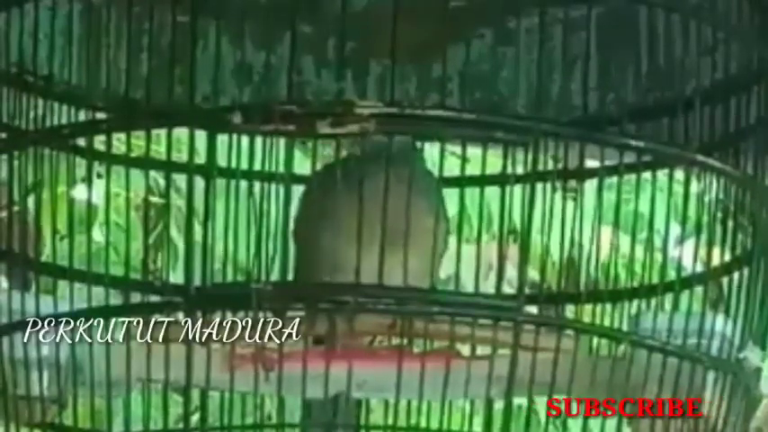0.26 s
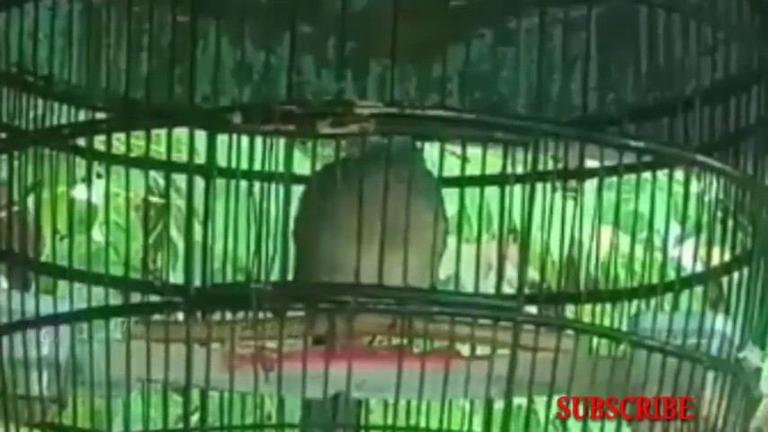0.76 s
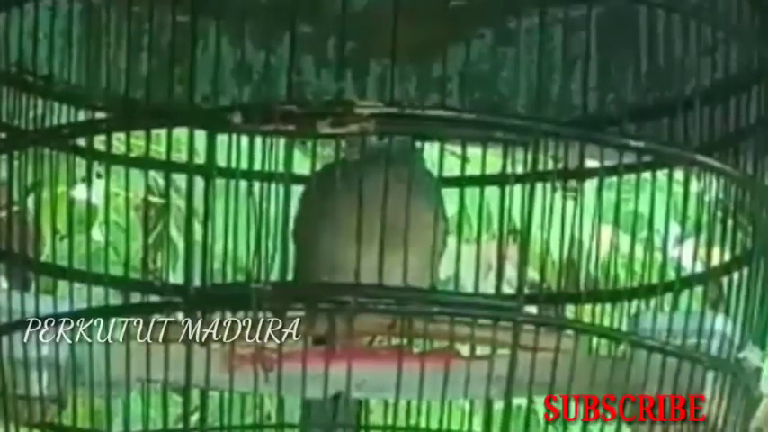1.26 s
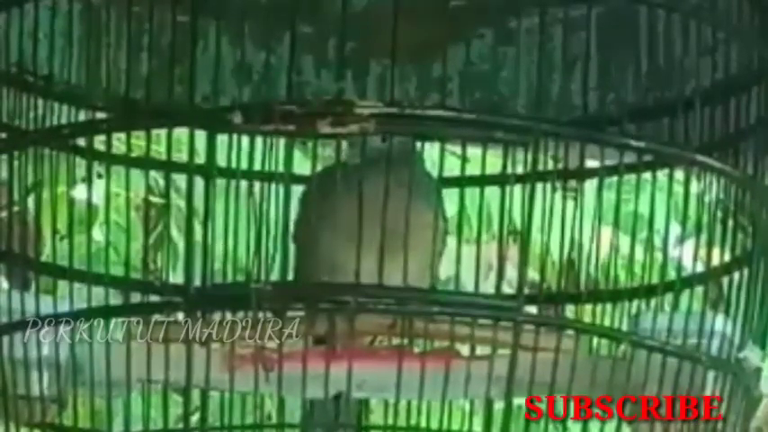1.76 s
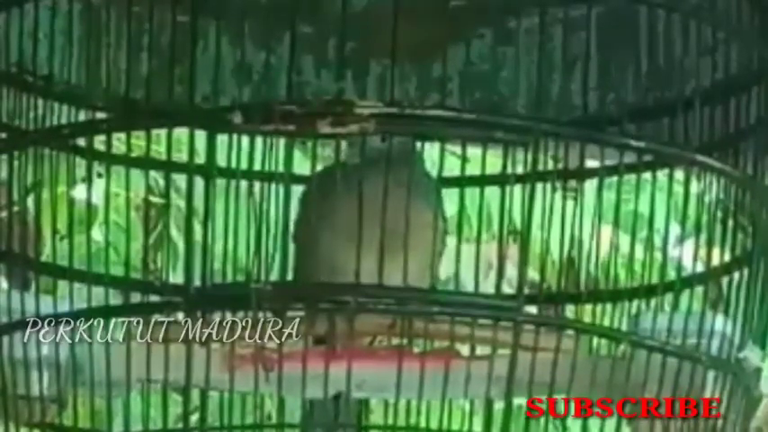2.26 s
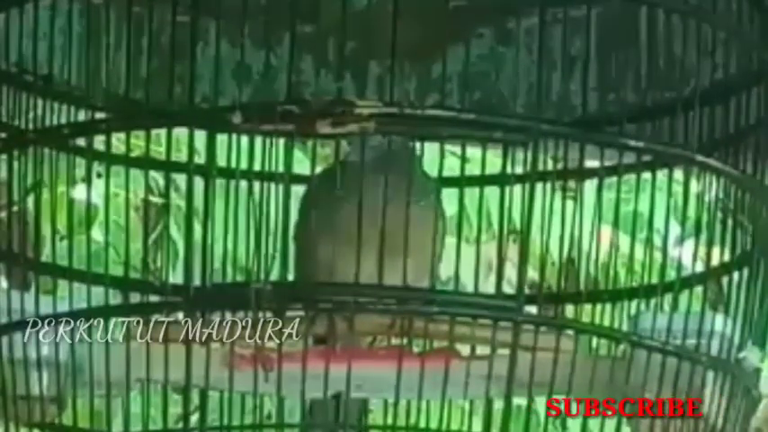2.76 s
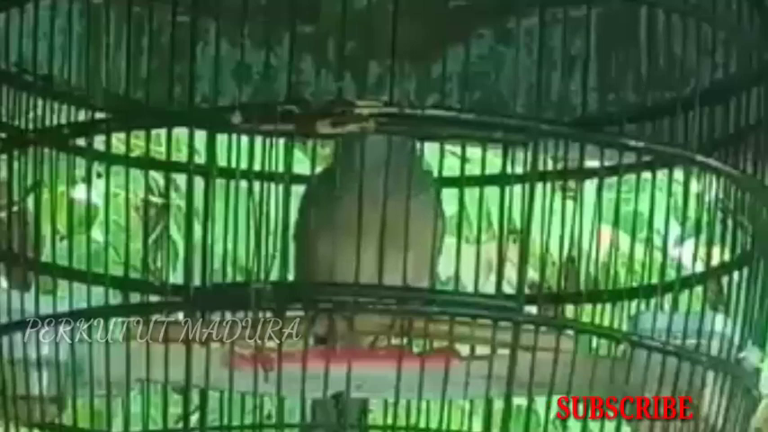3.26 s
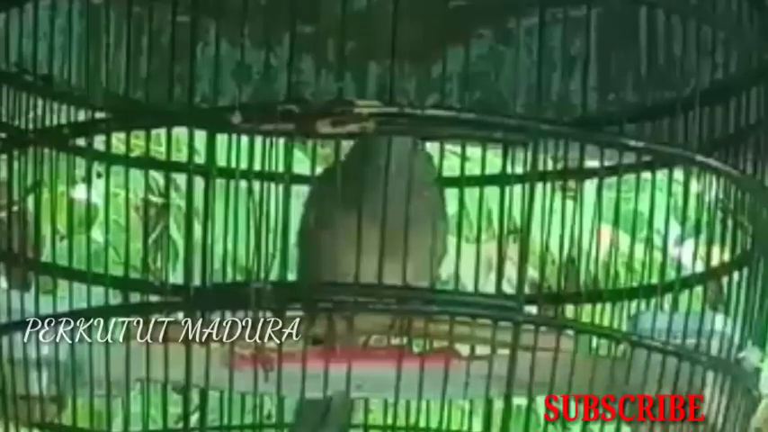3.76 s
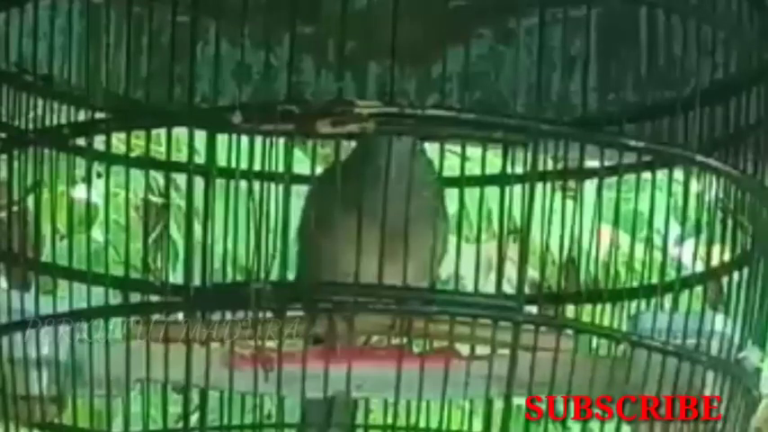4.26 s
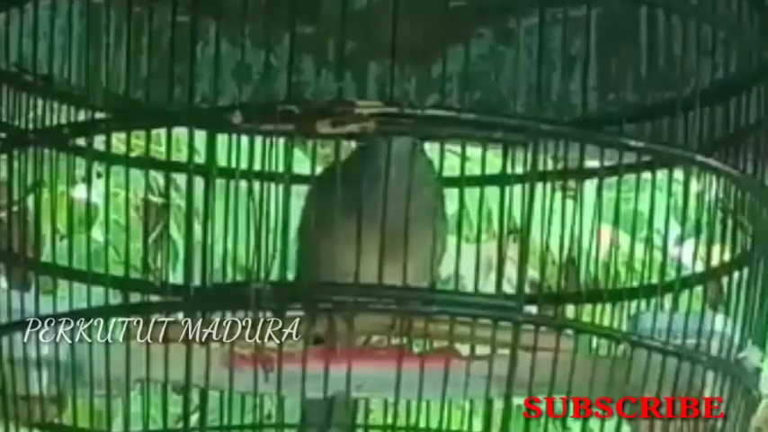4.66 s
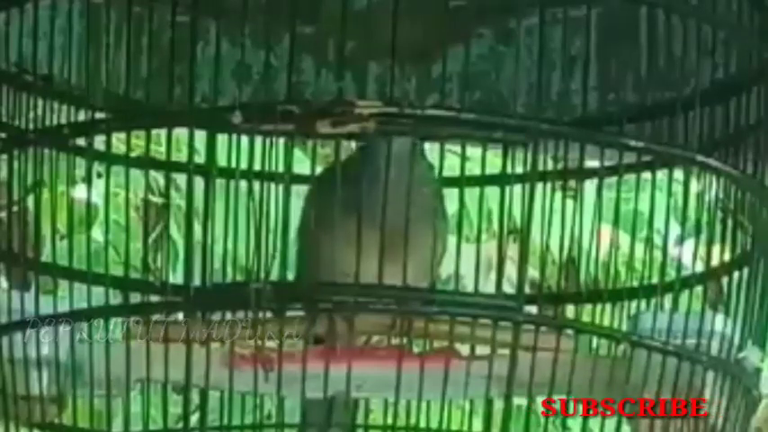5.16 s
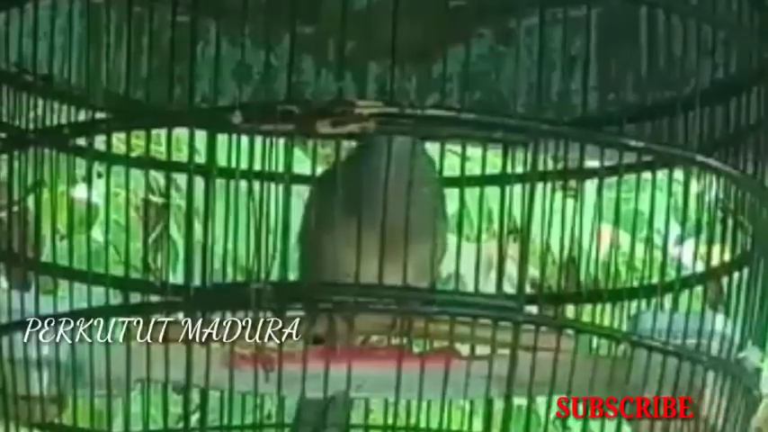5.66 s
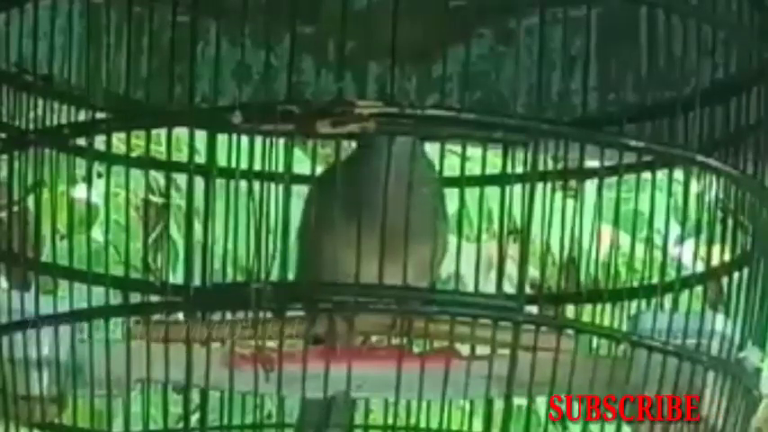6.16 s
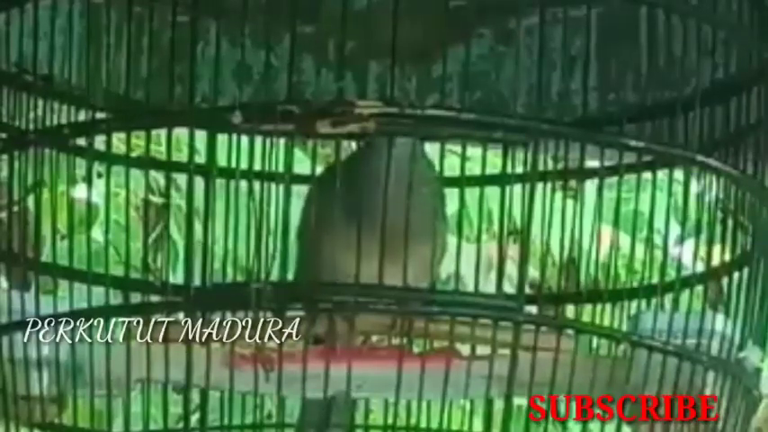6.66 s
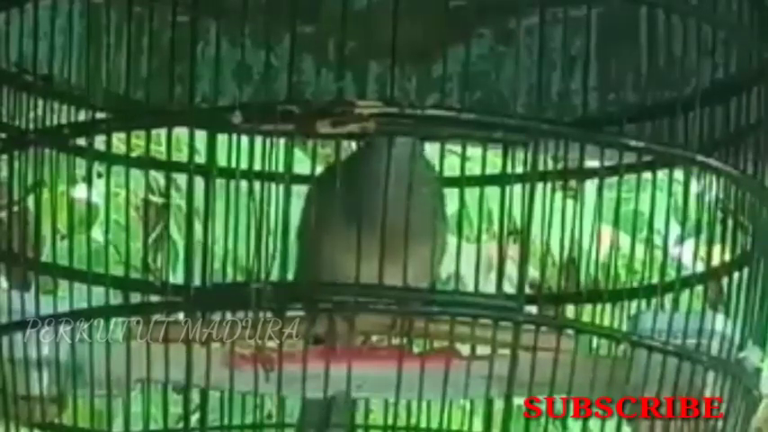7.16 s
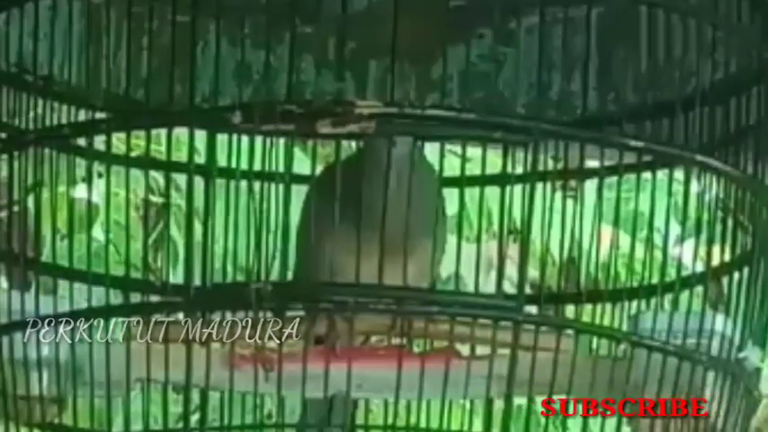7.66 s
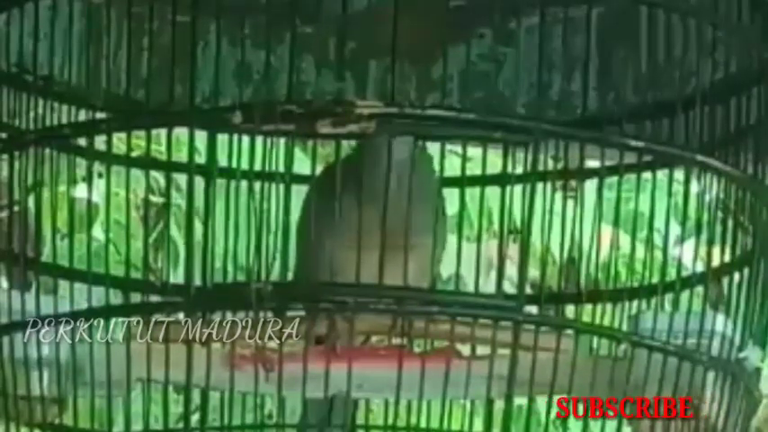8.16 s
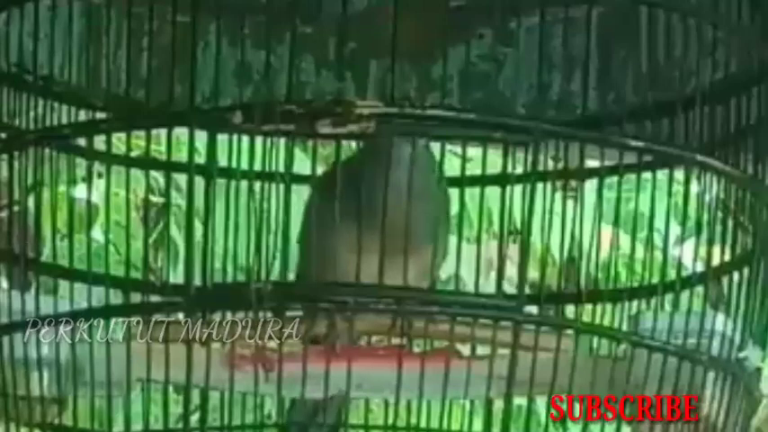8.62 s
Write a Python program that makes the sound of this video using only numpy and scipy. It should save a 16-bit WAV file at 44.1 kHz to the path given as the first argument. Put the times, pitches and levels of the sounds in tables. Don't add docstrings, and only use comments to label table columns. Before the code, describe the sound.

Close dove cooing in rounded flute-like bursts with pauses, distant replies, small taps and rustles, soft traffic rumble and an engine slowly gaining speed.

```python
import sys
import numpy as np
from scipy import signal
from scipy.fft import rfft, irfft, dct, next_fast_len
from scipy.io import wavfile
from scipy.ndimage import uniform_filter1d, minimum_filter1d

SR = 44100
rng = np.random.default_rng(int(sys.argv[2]) if len(sys.argv) > 2 else 0)


def generate_wav(signal):
    frames = np.transpose(np.atleast_2d(signal))
    scaled = np.clip(frames, -1, 1) * 32767
    pcm = np.round(scaled).astype(np.int16)
    wavfile.write(sys.argv[1], SR, pcm)


def gain_from_db(level_db):
    decades = np.asarray(level_db, float) / 20
    return 10 ** decades


N = 392049
T = np.arange(N) / SR


def unit_rms(x):
    return x / np.sqrt(np.mean(x ** 2) + 1e-20)


def in_time(rows):
    s, *columns = np.transpose(rows)
    return [np.interp(T, s, c) for c in columns]


def at_hz(points, hz):
    f, v = np.transpose(points)
    return np.interp(np.log(hz + 1), np.log(f), v)


def drift(rate_hz):
    pole = np.exp(-80 * np.pi * rate_hz / SR)
    noise = rng.standard_normal(N // 40 + 2002)
    slow = unit_rms(signal.lfilter([1], [1, -2 * pole, pole * pole], noise)[2000:])
    return np.interp(np.arange(N) / 40, np.arange(len(slow)), slow)


def phase(hz):
    return 2 * np.pi * np.cumsum(hz) / SR


def bump(at_s, half_s):
    return np.exp(-((T - at_s) / half_s) ** 2)


def band(x, low_hz, high_hz):
    sos = signal.butter(2, [low_hz, min(high_hz, .45 * SR)], "band", fs=SR, output="sos")
    return signal.sosfilt(sos, x)


def lowpass(x, cut_hz):
    return signal.sosfilt(signal.butter(4, cut_hz, fs=SR, output="sos"), x)


def left_right(left_db, right_db):
    return gain_from_db([[left_db], [right_db]])


LEFT_LAG_S = 0.000996


def sides(x, lean_db):
    late = np.interp(T - LEFT_LAG_S, T, x)
    return np.array([late * gain_from_db(lean_db / 2), x * gain_from_db(-lean_db / 2)])


# freq_hz, left_over_right_db
BALANCE = [(60, 5.5), (110, 2), (200, 4), (380, 1.5), (700, 7.5), (1290, 4.5), (2380, 16), (4400, 16),
           (8120, 9), (15000, -47.5)]
# freq_hz, share common to both sides
COHERENCE = [(60, 0.99), (160, 0.88), (300, 1), (600, 0.58), (1200, 0.062), (4000, 0.017)]


def street_noise(spectrum, patchy_db):
    size = next_fast_len(N, True)
    hz = np.arange(size // 2 + 1) * SR / size
    shared, left, right = rfft(rng.standard_normal((3, size)))
    alike = np.clip(at_hz(COHERENCE, hz), 0, 1)
    lean = gain_from_db(at_hz(BALANCE, hz) / 2)
    low_hz, high_hz = spectrum[0][0], spectrum[-1][0]
    colour = gain_from_db(at_hz(spectrum, hz)) * (hz > low_hz) * (hz < high_hz)
    late = np.exp(-2j * np.pi * hz * LEFT_LAG_S)
    common = np.sqrt(alike) * shared * [late, late ** 0]
    separate = np.sqrt(1 - alike) * np.array([left, right])
    pair = colour * (common + separate) * [lean, 1 / lean]
    out, together = 0, drift(8)
    place = 1.5 * np.log2(hz + 1)
    for k in range(int(1.5 * np.log2(low_hz)), int(1.5 * np.log2(high_hz)) + 2):
        patch = irfft(pair * np.sqrt(np.clip(1 - np.abs(place - k), 0, 1)), size)[:, :N]
        out = out + patch * gain_from_db(patchy_db * (0.32 * together + drift(18)))
    return out / np.std(out.mean(axis=0))


# freq_hz, density_db
RUMBLE = [(13, -49.5), (22, -50), (43, -19), (102, -3), (129, -3.5), (159, -4), (425, -24), (481, -29.5),
          (600, -24), (780, -28.5), (1320, -120)]
# freq_hz, density_db
HISS = [(260, -24.5), (450, -9), (798, 0), (932, 0), (966, 3), (1520, 5), (2310, 0), (3420, -4.5),
        (3950, -6), (6290, -5.5), (7350, -18.5), (7800, -99.5), (10100, -53.5), (17200, -120)]
# freq_hz, density_db
AIR = [(4790, -45), (8150, 0), (8820, 9.5), (9310, 5), (11300, -5), (12900, -27), (14500, -32),
       (15300, -36), (15600, -23)]
# centre_s, lift_db, half_length_s
RUSTLES = [(0.28, 4, 0.099), (1.718, 5.5, 0.055), (1.955, -0.5, .05), (2.083, 4.5, 0.096),
           (2.516, 5.5, 0.027), (2.91, 5, 0.047), (3.809, 6.5, 0.038), (4.06, 1.5, .03), (4.907, 7, 0.034),
           (6.134, 7, 0.059), (7.0, 2, 0.069), (8.532, -5.5, 0.032), (8.624, 5, 0.052)]


def street(calling):
    rumble_db = -45.5 + .5 * T - 2 * calling
    hiss_db = -42 + 0.94 * drift(7.4) - 0.5 * calling
    air_db = -58.5 - np.array([[2.0], [4.0]]) * calling
    rustle = gain_from_db(sum(db * bump(s, half_s) for s, db, half_s in RUSTLES)) - 1
    hiss = street_noise(HISS, patchy_db=1.6)
    hiss = hiss + rustle * (.45 * hiss + 0.7 * band(hiss, 1200, 3300))
    rumble = gain_from_db(rumble_db) * street_noise(RUMBLE, patchy_db=3.5)
    return rumble + gain_from_db(hiss_db) * hiss + gain_from_db(air_db) * street_noise(AIR, patchy_db=2.0)


# time_s, level_db
HUM = [
    (0, -47.5),
    (.5, -42.5),
    (.75, -63),
    (1.75, -49.5),
    (1.95, -51),
    (3.1, -44.5),
    (3.7, -57.5),
    (4.15, -46.5),
    (4.6, -51),
    (5.0, -49.5),
]
# time_s, firing_hz, load_db
ENGINE = [
    (5.7, 24.86, -50.5),
    (6.2, 23.94, -35.5),
    (6.6, 25.26, -42.5),
    (6.85, 25.55, -53),
    (7.15, 26.78, -43),
    (8.1, 27.68, -31.5),
    (8.67, 28.21, -40),
    (8.73, 29.67, -43),
    (8.89, 28.45, -36.5),
]


def engine_and_hum():
    pipe_hz, pipe_width_hz = 124, 8.6
    rate_hz, load_db = in_time(ENGINE)
    turn = phase(rate_hz)
    running = np.clip((T - ENGINE[0][0]) / 0.6, 0, 1)
    low = 0
    for order in range(4, 6):
        order_db = load_db - ((order * rate_hz - pipe_hz) / pipe_width_hz) ** 2
        low = low + running * gain_from_db(order_db) * np.sin(order * turn)
    hum_db, = in_time(HUM)
    low = low + (1 - running) * gain_from_db(hum_db) * np.sin(phase(121.7 + 1.5 * drift(2.5)))
    return sides(np.sqrt(2) * low * gain_from_db(1.5 * drift(3)), 3.3)


# time_s, pitch_hz, level_db
WHINE = [
    (8.5, 2800, -52),
    (8.54, 2880, -42),
    (8.62, 2970, -44),
    (8.66, 3190, -40),
    (8.76, 3470, -41),
    (8.82, 3680, -42),
    (8.89, 3800, -41),
]


def gear_whine():
    hz, db = in_time(WHINE)
    rough = 0.94 + .5 * drift(120)
    whine = gain_from_db(db + 1.0) * (T > WHINE[0][0]) * rough * np.sin(phase(hz + 32 * drift(50)))
    haze = band(rng.standard_normal(N), 100, 560)
    whine += gain_from_db(db + 8.5) * (T > 8.66) * haze * np.sin(phase(hz))
    whine += gain_from_db(-44) * bump(7.1, 0.044) * drift(180) * np.sin(2 * np.pi * 4220 * T)
    return sides(whine, 12)


# start_s, peak_db, pitch_hz
KNOCKS = [(0.279, -27, 2220), (0.3455, -32, 2390), (1.318, -26, 1710), (1.5716, -24.5, 1420),
          (1.6882, -27, 1610), (2.2286, -26, 1760), (2.2754, -36, 2750), (2.3243, -25.5, 1600),
          (2.732, -30, 1640), (3.171, -42.5, 2210), (3.268, -29, 1720), (3.4224, -29.5, 1400),
          (4.0394, -36.5, 3200), (4.5686, -23.5, 2150), (4.5702, -34.5, 4020), (4.8286, -38.5, 1850),
          (5.1347, -32, 1520), (5.215, -34.5, 2350), (5.6047, -28.5, 1680), (6.0051, -23.5, 1750),
          (6.5174, -29.5, 2110), (6.621, -52, 1450), (6.895, -33, 2400), (6.976, -29, 1480),
          (7.331, -26.5, 1960), (7.352, -30, 2580), (7.654, -24, 1910), (7.48, -32, 2420),
          (7.77, -30, 1285), (7.889, -27.5, 2170), (8.192, -30, 2280), (8.598, -34, 3900),
          (8.669, -35.5, 4900), (1.645, -36, 4480), (1.714, -37.5, 3900), (1.91, -34.5, 2700)]


def knocks():
    rattle_t60_s, crack_t60_s, crack_db, snap = 0.033, 0.0053, -15.5, 14
    out, noise, t = np.zeros(N), rng.standard_normal(N), T[:SR // 8]
    for start_s, peak_db, hz in KNOCKS:
        at = round(start_s * SR)
        part = t[:N - at]
        burst = noise[at:at + len(part)] * gain_from_db(-60 * part / rattle_t60_s)
        burst[0] += snap
        body = band(burst, .75 * hz, 1.5 * hz)
        crack = band(burst * gain_from_db(crack_db - 60 * part / crack_t60_s), 2500, 6500)
        out[at:at + len(part)] += gain_from_db(peak_db + 3) * (body + crack)
    return sides(lowpass(out, 7000), 15.0)


# start_s, peak_db, lower_band_db, t60_s
SWISHES = [(0.343, -41.5, 13.5, 0.022), (0.918, -47.5, 15, 0.07), (1.588, -28, -5, 0.17),
           (1.7754, -32.5, 4, 0.31), (1.963, -40, 1, 0.14), (1.992, -24, -8.5, 0.16), (2.479, -45, 8, .05),
           (6.69, -39, 1, 0.063), (6.95, -46, -2, .05), (8.086, -39, -1, .05), (5.333, -36.5, -3, 0.11),
           (2.868, -53, 18, 0.16), (3.171, -61, 24.5, 0.013), (3.773, -42.5, 8.5, 0.051),
           (4.038, -27.5, 5, 0.29), (4.568, -44, 3, 0.026), (5.136, -36, 7.5, 0.046),
           (5.23, -29.5, -13, 0.048), (5.353, -29.5, -3.5, 0.12), (5.764, -51, 7, 0.015),
           (6.098, -31, 4.5, 0.49), (6.7078, -30, -3.5, 0.056), (7.327, -35, 1, 0.062),
           (7.6612, -40.5, 6, 0.11), (7.9458, -29.5, -6, 0.13), (8.312, -32.5, 0, 0.47),
           (8.4403, -35.5, 0.5, 0.08), (8.594, -41, -2, .03)]


def swishes():
    noise, t = rng.standard_normal((2, N)), T[:SR // 4]
    bright = 0.71 * band(noise, 8600, 14000) + 1.2 * band(noise, 13300, 16500)
    dull = band(noise, 4800, 7200)
    high, low = np.zeros(N), np.zeros(N)
    for start_s, peak_db, lower_db, t60_s in SWISHES:
        at = round(start_s * SR)
        part = t[:N - at]
        stroke = gain_from_db(peak_db - 60 * part / max(t60_s, .01)) * np.clip(part / 0.0029, 0, 1)
        high[at:at + len(part)] += stroke
        low[at:at + len(part)] += stroke * gain_from_db(lower_db)
    return 0.74 * bright * high + dull * low * left_right(4.0, -6.0)


def coo(notes):
    out = np.zeros(N)
    wobble, flutter = drift(40), drift(65)
    for start_s, scoop_s, length_s, top_hz, end_hz, level_db in notes:
        at = round(start_s * SR)
        t = T[:min(round(length_s * SR), N - at)]
        span = slice(at, at + len(t))
        depth = .3 * min(scoop_s / .018, 1)
        climb = depth * (1 - np.sin(np.clip(t / scoop_s, 0, 1) * np.pi / 2))
        arch = .07 * min(length_s / .2, 1) ** 2 * np.exp(-t / .025)
        hz = (top_hz + (end_hz - top_hz) * (t / length_s) ** 1.486) * (1 - climb - arch)
        turn = phase(hz * (1 + .008 * min(0.065 / length_s, 1) * wobble[span]))
        slow_rise_s = .6 * length_s * (end_hz > top_hz + 50)
        rise_s = max(scoop_s, .012, .14 * length_s, slow_rise_s)
        swell = np.clip(t / rise_s, 0, 1) ** .9 * np.clip((length_s - t) / .012, 0, 1)
        shake_db = 1.8 * min(.07 / length_s, 1) * flutter[span]
        resonance = gain_from_db(-30) / (1 + ((2 * hz - 2070) / 110) ** 2) * min(length_s / .15, 1)
        octave = gain_from_db(-30) * (hz < 1120) + resonance
        tone = np.sin(turn) + octave * np.sin(2 * turn)
        out[span] += gain_from_db(level_db + 9.5 + shake_db) * swell * tone
    return signal.sosfilt(signal.butter(4, 700, "high", fs=SR, output="sos"), out)


# after_start_s, length_s, top_hz, end_hz, level_db
FAR_NOTES = [
    (-.005, 0.064, 1005, 998, -36.5),
    (0.035, .13, 1270, 1223, -44.5),
    (.17, 0.1, 1214, 1127, -43),
    (.29, .05, 998, 1002, -40),
    (.32, 0.13, 1211, 1174, -45),
]
# start_s, length_s, top_hz, end_hz, level_db
FAR_ENDINGS = [
    (.79, .08, 1185, 1180, -41),
    (.66, .09, 1000, 990, -46),
    (.72, .07, 1120, 1100, -46),
    (4.25, .12, 1200, 1180, -45),
    (4.625, .065, 1215, 1170, -47),
    (4.7, .055, 1170, 1110, -46),
    (4.77, .06, 1185, 1170, -51),
    (7.56, .075, 1215, 1170, -45),
    (7.675, .065, 1170, 1110, -45),
]
# start_s, level_db
FAR_PHRASES = [
    (0.43, -2.5),
    (4.19, -3),
    (7.106, -3.5),
]


def far_dove():
    scoop_s = 0.021
    notes = [(s, scoop_s, *shape) for s, *shape in FAR_ENDINGS]
    for start_s, phrase_db in FAR_PHRASES:
        notes += [(start_s + s, scoop_s, *shape, db + phrase_db) for s, *shape, db in FAR_NOTES]
    return coo(notes) * gain_from_db(-drift(25)) * (.7 + .7 * drift(90))


# start_s, length_s, top_hz, end_hz, level_db
LEVEL_NOTES = [(1.028, 0.095, 1179, 1082, -24), (1.49, 0.036, 1192, 1210, -33.5),
               (1.735, 0.034, 1195, 1180, -41.5), (3.434, 0.195, 1031, 1019, -15),
               (3.629, .03, 1018, 1008, -22), (3.719, 0.039, 995, 990, -27), (3.888, .075, 1188, 1059, -19),
               (3.91, .06, 979, 970, -21.5), (4.053, 0.027, 1102, 1160, -40.5),
               (0.85, 0.036, 894, 914, -31), (8.67, 0.036, 959, 1008, -26), (3.669, 0.038, 971, 1005, -21),
               (3.749, 0.081, 986.6, 997, -22), (3.839, 0.043, 976, 1005, -22.5),
               (3.955, 0.073, 1006, 1006, -27.5), (5.553, 0.066, 1226, 1208, -14),
               (5.605, 0.062, 1209, 1129, -17), (5.657, 0.097, 1008, 966, -23),
               (8.395, 0.047, 1120, 1056, -19), (8.449, 0.044, 1023, 960, -18.5),
               (8.497, 0.078, 993, 953, -20.5), (8.597, 0.04, 1025, 987, -19), (8.639, .022, 992, 955, -21),
               (8.564, 0.039, 959, 955, -27.5), (8.773, 0.11, 1025, 968, -28.5)]
# start_s, length_s, top_hz, level_db, undertone_db
LEAPS = [
    (0.96, 0.039, 1243, -15.5, -36),
    (5.489, 0.081, 1195, -20, -26.5),
    (5.69, 0.031, 1205, -17, -26.5),
    (8.288, 0.1, 1174, -17.5, -21.5),
    (8.701, 0.069, 1123, -20, -26),
]
# start_s, length_s, top_hz, level_db
SWOOPS = [
    (0.874, 0.11, 1262, -17),
    (1.283, 0.051, 1195, -22.5),
    (1.396, 0.051, 1196, -19.5),
    (1.561, 0.065, 1195, -20.5),
    (6.073, 0.065, 1195, -22),
]
# start_s, end_s, top_hz, level_db
TRILLS = [
    (1.118, 1.265, 1090, -21),
    (5.717, 6.05, 1123, -19),
]
# start_s, level_db
LEAD_INS = [
    (.87, -27.5),
    (1.381, -27),
    (1.545, -26.5),
    (6.061, -29.5),
    (5.462, -19),
    (8.255, -18.5),
]


def song():
    level_scoop_s, pulse_s = .0045, 0.03

    def sagging(rows, scoop_s, sag_hz_per_s):
        return [(s, scoop_s, length_s, hz, hz - sag_hz_per_s * length_s, db) for s, length_s, hz, db in rows]

    def undertone(s, db):
        return (s + .022, level_scoop_s, .055, 968.7, 935.8, db)

    pulses = []
    uneven = rng.standard_normal((len(TRILLS), 12, 2))
    for (start_s, end_s, hz, db), chance in zip(TRILLS, uneven):
        for s, (late, high) in zip(np.arange(start_s, end_s, .038), chance):
            pulses.append((s + .002 * late, pulse_s, hz + 13 * high, db))
    afterbeats = [(s + length_s, 0.075, 1195, db - 14) for s, length_s, _, db in SWOOPS]
    notes = [(s, level_scoop_s, *shape) for s, *shape in LEVEL_NOTES]
    notes += [(s, level_scoop_s, .05, 925, 1005, db) for s, db in LEAD_INS]
    notes += sagging([row[:-1] for row in LEAPS], 0.015, 1100)
    notes += sagging(SWOOPS, 0.018, 290)
    notes += sagging(pulses + afterbeats, .019, 1700)
    notes += [undertone(s, db - 8) for s, _, _, db in pulses[::2]]
    notes += [undertone(s, db) for s, *_, db in LEAPS]
    notes += [undertone(s, db - 12) for s, _, _, db in SWOOPS]
    return notes


# start_s, end_s
ROLLED = [
    (1.0, 1.8),
    (5.45, 6.3),
]


def near_dove():
    beat = np.sin(phase(53 + 6 * drift(15)))
    rolled = sum((T > start_s) & (T < end_s) for start_s, end_s in ROLLED)
    return coo(song()) * (1 + .5 * beat * rolled)


# centre_s, level_db
PUFFS = [
    (0.866, -38),
    (3.425, -31),
    (5.468, -33.5),
    (8.264, -36),
]


def puffs():
    swell = sum(gain_from_db(db) * bump(s, 0.021) for s, db in PUFFS)
    breath = band(band(rng.standard_normal((2, N)), 762, 1750), 762, 1750)
    return swell * unit_rms(breath) * left_right(3.0, -3.0)


# freq_hz, left_db, right_db, t60_s
PORCH_MODES = [(898, -5.5, -15, .3), (835, -11.5, -5, .3), (862, 0, -12, 0.11), (996, -24.5, -12, 0.15),
               (970, -4.5, -4.5, 0.11), (1057.6, 3, -0.5, .3), (1133, 4, -14.5, 0.24),
               (1081.5, -10.5, 2, 0.39), (1109, -2.5, -15.5, 0.6), (1137, -12.5, -7, 1),
               (1330, -31.5, -28, 0.3), (1160, -7.5, -34.5, 0.59), (1262, -13.5, -10.5, 0.12),
               (1138.4, -6, -16, .3)]


def porch(x):
    t = T[:SR // 2]
    tail = rng.standard_normal((2, len(t))) * gain_from_db(-60 * t / 0.4) * np.clip(t / 0.0075, 0, 1)
    reply = tail / np.sqrt(np.sum(tail ** 2, axis=1, keepdims=True)) * left_right(-1.5, -7)
    starts = rng.uniform(0, 2 * np.pi, (len(PORCH_MODES), 2, 1))
    for (hz, left_db, right_db, t60_s), start in zip(PORCH_MODES, starts):
        ring = gain_from_db(-60 * t / min(t60_s, .26)) * np.sin(2 * np.pi * hz * t + start)
        reply = reply + left_right(left_db - 54, right_db - 54) * ring
    return signal.fftconvolve(x[None], reply, axes=1)[:, :N]


def scene():
    near, far, taps = near_dove(), far_dove(), knocks()
    dulled = lowpass(near, 1600) + .2 * near
    echo = porch(dulled + far + gain_from_db(-10) * taps[0])
    doves = near * left_right(0, -15) + echo + gain_from_db(-8.5) * far
    calling = np.clip(uniform_filter1d(np.abs(near), size=SR // 8) / 0.11, 0, 1)
    return doves + street(calling) + engine_and_hum() + gear_whine() + taps + swishes() + puffs()


def limit(x):
    gain = minimum_filter1d(np.minimum(1, .7 / (np.abs(x).max(axis=0) + 1e-9)), size=600)
    return x * uniform_filter1d(gain, size=400)


# freq_hz, step_over_local_level_db
COARSENESS = [(350, -4), (560, 3), (750, -14), (1200, -13), (1600, -1), (2500, 3), (3500, 6), (6000, 7),
              (7500, 9), (9000, 3), (15000, 6)]
# freq_hz, step_db
LEAST_STEP = [(2500, -62), (4000, -48), (6500, -47), (7500, -42), (8150, -40), (8400, -60), (9400, -54),
              (11500, -58), (12800, -54), (14300, -55), (15500, -50)]


def round_spectrum(x):
    size, half = 1024, 512
    count = N // size + 3
    padded = np.pad(x, ((0, 0), (size, count * size - N))).reshape(2, -1, size)
    window = np.sin(np.pi * (np.arange(2 * size) + .5) / (2 * size))
    frames = np.concatenate([padded[:, :-1], padded[:, 1:]], axis=2) * window
    a, b, c, d = np.split(frames, 4, axis=2)
    bins = dct(np.concatenate([-c[..., ::-1] - d, a - b[..., ::-1]], axis=2), type=4, norm="ortho")
    level = np.sqrt(np.abs(uniform_filter1d(bins ** 2, size=24, axis=2)) + 1e-14)
    uneven = np.repeat(rng.standard_normal((2, count, size // 16)), 16, axis=2)
    hz = np.arange(size) * SR / (2 * size)
    loud_db = 10 * np.log10(np.mean(bins ** 2, axis=(0, 2))[:, None] + 1e-12) + 38
    starved = (hz > 9150) * (hz < 10800)
    least = gain_from_db(at_hz(LEAST_STEP, hz) + .75 * loud_db * starved)
    relative = gain_from_db(at_hz(COARSENESS, hz) + 0.12 * loud_db * (hz > 1500))
    step = np.maximum(level * relative, least) * gain_from_db(2.6 * uneven)
    back = dct(step * np.round(bins / step), type=4, norm="ortho")
    first, second = back[..., :half], back[..., half:]
    laps = np.concatenate([second, -second[..., ::-1], -first[..., ::-1], -first], axis=2) * window
    return (laps[:, 1:, :size] + laps[:, :-1, size:]).reshape(2, -1)[:, :N]


def round_keeping_attacks(x):
    sudden_db = -49
    treble = signal.butter(2, 7000, "high", fs=SR, output="sos")
    high = signal.sosfiltfilt(treble, x)
    lift = np.maximum(1, np.sqrt(np.abs(uniform_filter1d(high ** 2, size=130))) / gain_from_db(sudden_db))
    rounded = round_spectrum(x - high + high / lift)
    return rounded + (lift - 1) * signal.sosfiltfilt(treble, rounded)


def top_cut(x):
    return signal.sosfilt(signal.butter(12, 16000, fs=SR, output="sos"), x)


def record(dry):
    top = signal.cheby2(10, 40, 16000, fs=SR, output="sos")
    gap = signal.butter(2, [7700, 8200], "bandstop", fs=SR, output="sos")
    mix = signal.sosfilt(gap, signal.sosfilt(top, dry))
    mix = round_keeping_attacks(limit(mix))
    return top_cut(mix)


dry = scene()
out = record(dry)
generate_wav(out)
```